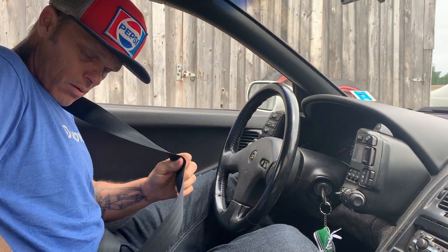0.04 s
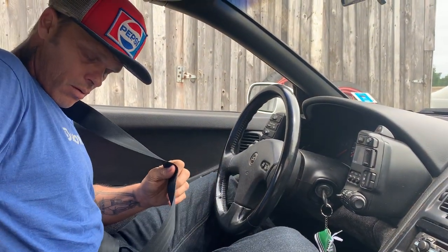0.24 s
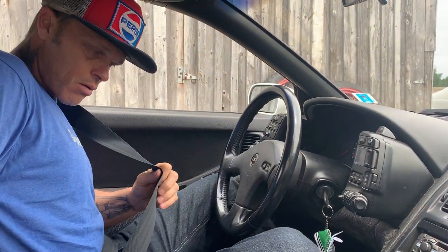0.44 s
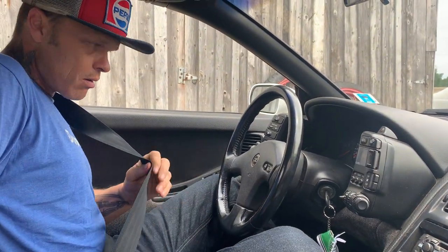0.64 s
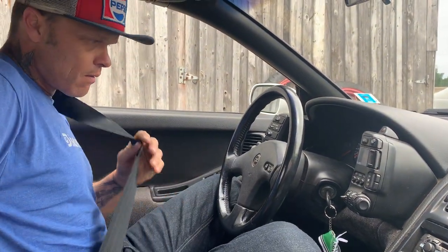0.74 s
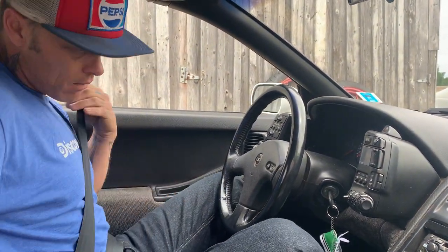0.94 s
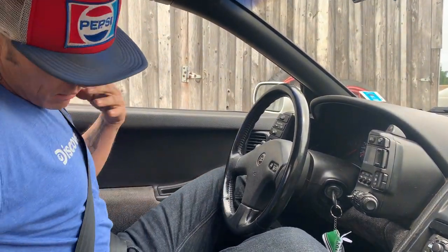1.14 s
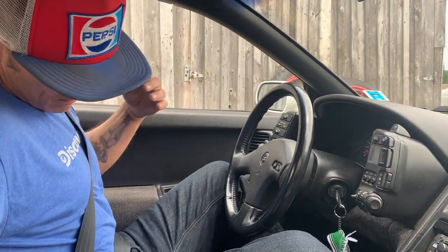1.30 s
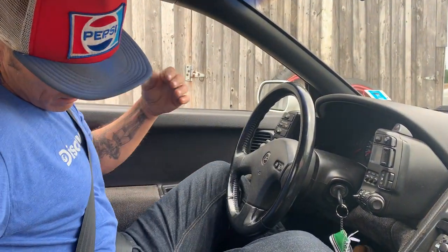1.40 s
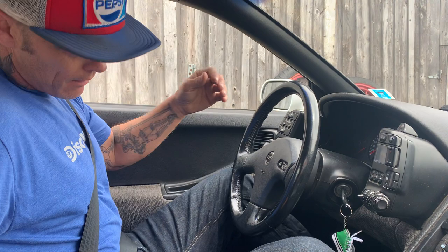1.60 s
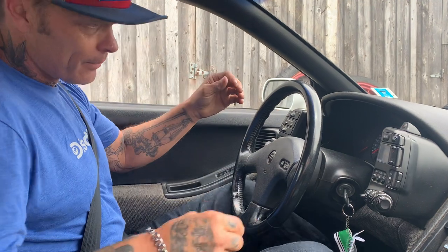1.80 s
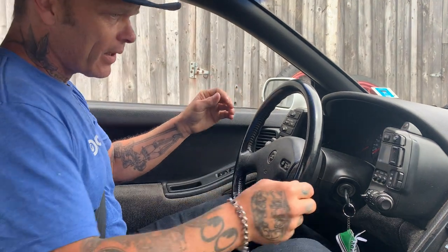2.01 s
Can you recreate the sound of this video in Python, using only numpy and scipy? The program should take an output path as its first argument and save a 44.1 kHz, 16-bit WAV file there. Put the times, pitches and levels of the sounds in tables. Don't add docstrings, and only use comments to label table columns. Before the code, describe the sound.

Seatbelt fastening heard close up in a quiet, dry car interior: the tongue fumbles and taps, latches with a loud ringing snap, then the belt hisses against clothing, the seat creaks briefly, and movement fades to near silence.

```python
import sys
import numpy as np
from scipy import signal
from scipy.fft import rfft, irfft
from scipy.io import wavfile
from scipy.ndimage import uniform_filter1d

SR = 44100
rng = np.random.default_rng(int(sys.argv[2]) if len(sys.argv) > 2 else 0)


def undo_db(level):
    steps = np.asarray(level, float) / 20
    return 10 ** steps


def persist_wave(psi):
    counts = np.round(np.clip(psi, -1, 1) * 32767).astype(np.int16)
    wavfile.write(sys.argv[1], SR, np.atleast_2d(counts).T)


N = 90493
T = np.arange(N) / SR
F = np.arange(N // 2 + 1) * SR / N
TAP = 1. * (T[:SR // 5] == 0)

# hz, density_db
QUIET_SPECTRUM = [(200, -10.5), (700, -10.5), (1600, -5), (2200, -31), (6000, -31), (16000, -15)]
QUIET_DB = -71.5

# time_s, rustle_db, dullness_db, seat_rumble_db
MOTION = [(0, -63.5, 4, -47.5), (.13, -57, -1, -59.5), (0.261, -66.5, 6.5, -51.5), (.38, -68, 9.5, -51),
          (0.549, -59.5, 1, -49), (0.643, -71, -3, -58.5), (.69, -56.5, -9, -52), (0.811, -57.5, 0, -52),
          (0.918, -52, -4, -49.5), (1.1, -53, -7, -47), (1.169, -62.5, 9.5, -48),
          (1.301, -56.5, -4.5, -59.5), (1.402, -63, 7, -56), (1.501, -79.5, 3, -55.5), (1.64, -75, 10, -67),
          (1.78, -70, -4, -55), (1.92, -70, 8.5, -57.5), (2.05, -69, 14.5, -50)]
# hz, density_db
WEBBING_SPECTRUM = [(300, -20), (700, -10), (1500, -3.5), (3500, -3), (6000, -7.5), (8500, -3), (11000, -5),
                    (16000, -5.5)]
# hz, density_db
SHIRT_SPECTRUM = [(300, -8), (800, -2), (2500, -3), (5000, -9), (9000, -33)]
# hz, density_db
RUMBLE_SPECTRUM = [(20, -21.5), (40, 3.5), (70, 5), (190, -3), (300, -12), (600, -25.5), (1200, -37.5),
                   (3000, -73.5)]
RUMBLE_FLICKER_DB, RUMBLE_FLICKER_HZ = 1.5, 21.9
GRAINS_PER_S, GRAIN_DB, GRAIN_SPREAD_DB = 900, -7.5, 1.8
FIBRE_FLICKER_DB, FIBRE_FLICKER_HZ = 4.08, 25.38

# start_s, level_db, pitch_hz, t60_s, settled_pitch_share
THUDS = [(0.015, -33, 182, 0.081, 0.3), (.182, -36, 230, 0.077, 0.55), (.203, -38.5, 112, 0.13, 0.59),
         (.296, -45, 200, 0.067, 0.69), (.341, -35.5, 240, 0.088, 0.76), (.372, -36.5, 195, 0.11, .7),
         (0.395, -41, 147, 0.069, 1), (.407, -37.5, 190, .1, 0.71), (0.476, -36.5, 200.4, .1, 0.36),
         (0.514, -31.5, 202.5, 0.084, 0.82), (.53, -38, 68.3, 0.24, 0.68), (0.561, -34.5, 88.6, .22, 0.58),
         (.786, -30.5, 199, 0.26, 0.31), (.665, -46, 172, 0.23, 0.28), (0.879, -41, 138, 0.26, 0.56),
         (1.22, -39.5, 128.5, 0.2, .3), (1.456, -44.5, 200, .08, 0.33), (1.468, -42, 139.3, 0.14, 0.5),
         (1.706, -49, 260, 0.097, 0.43), (1.937, -41.5, 159, 0.073, 0.68)]
THUD_GLIDE_S, THUD_RISE_S = .012, 0.0014

# start_s, level_db, stiffness_pitch_factor, upper_modes_db
CREAKS = [(.912, -22.5, 0.97, -1.5), (0.942, -28.5, 0.99, 11), (.947, -25, 0.96, 1), (.977, -24, 0.9, -8),
          (1.018, -30, 1.2, -2), (1.022, -22.5, 1.2, -10), (1.054, -26, 0.98, 5), (1.057, -24, 0.99, -6),
          (1.08, -29, 0.99, 3), (1.118, -33, 1.4, 0), (1.125, -19.5, 0.89, -4), (1.141, -29.5, 1.05, 4)]
# pitch_hz, level_db, t60_s
SEAT_MODES = [(240, 6, 0.035), (320, 0, 0.017), (408, -1.5, 0.022), (707, -1.5, 0.033), (982, -2, 0.018),
              (1374, -1.5, .025), (1550, -8, .02)]
SEAT_UPPER_HZ = 850

# start_s, level_db, length_s, centre_hz
RATTLES = [
    (0.29, -55.5, 0.011, 1230),
    (0.331, -54, 0.087, 921),
    (0.451, -56.5, 0.06, 2040),
    (0.696, -46.5, 0.039, 14600),
    (0.88, -56.5, 0.13, 303),
    (1.029, -57, 0.1, 320),
    (1.109, -53.5, 0.049, 264),
    (1.542, -83, 0.23, 1600),
    (1.696, -67.5, 0.043, 380),
    (1.948, -61, 0.1, 500),
]
RATTLE_PER_S, RATTLE_SKIRT_DB = 700, -15.5
# start_s, level_db, ring_hz, ring_db, brightness_db
KNOCKS = [(0.1627, -36, 3350, -11.5, 2.5), (.165, -54, 4300, 6.5, -7), (.1655, -59, 3720, 2.5, -9),
          (0.174, -49, 5860, 0.5, -14), (.212, -52.5, 1456, 4, -8), (.265, -68, 1550, 7, -29),
          (0.2878, -46.5, 1550, -2, -3), (.289, -55, 3000, 3.5, -6), (0.2901, -60, 1050, 6, -14),
          (.297, -57.5, 505, 10, -16), (.329, -54.5, 910, -6, -15), (.338, -53, 2080, 0.5, -13),
          (0.353, -47.5, 4320, -8, -2), (0.356, -53.5, 1045, 3, -20), (0.367, -57.5, 3540, -0.5, 6),
          (0.3862, -50.5, 1034, 5.5, -18.5), (.387, -50.5, 1950, -0.5, -19.5), (.396, -52.5, 1900, -2, -28),
          (0.444, -61.5, 3930, 2, -24), (.4565, -48.5, 950, -1.5, -24.5), (0.458, -64, 2900, 3, -18),
          (0.4659, -47.5, 964, -1, 20.5), (.469, -62, 4000, 5, -21.5), (.669, -56, 1900, -4.5, -9.5),
          (.737, -41, 1088, -6.5, 6), (.748, -50.5, 1480, -4, -18), (0.7666, -44.5, 4480, -6.5, -4.5),
          (.769, -49.5, 6450, 2, -13), (1.098, -62.5, 1810, 4.5, -18), (1.273, -63, 970, 4, -24)]
KNOCK_S, KNOCK_T60_S = 0.0044, .028

# start_s, level_db, length_s
LATCH_CONTACTS = [(0.4877, -31.5, 0.0049), (0.4932, -37, 0.0039), (0.4978, -11.5, .0016),
                  (0.4997, -12.5, 0.0023), (0.501, -13.5, .001), (0.5033, -23, 0.0024), (.5062, -24, 0.001),
                  (.509, -29.5, 0.0027), (.5125, -29, 0.0018), (.516, -32.5, 0.003), (0.519, -39.5, .0096)]
# hz, density_db
CRACK_SPECTRUM = [(300, -33), (1100, -17.5), (1900, 1), (3500, -12), (5200, -13.5), (6800, -8), (9300, -12),
                  (15500, -3.5)]
# pitch_hz, level_db, t60_s
BUCKLE_MODES = [(1431, 0.5, 0.055), (1548, 1, .05), (1602, -6.5, 0.086), (1900, 0.5, 0.034),
                (2014, 4, 0.066), (2070, 2, .05), (2453, -6, .04), (3377, -14.5, 0.061), (3705, -11, .07),
                (4070, -12.5, .08), (5294, -18.5, .07), (6330, -3.5, 0.055), (6560, -2.5, .05),
                (7060, -15.5, 0.033)]
BUCKLE_DB, BUCKLE_T60_TOP_S = 8.5, .075
# pitch_hz, level_db, t60_s
PAWL_MODES = [(11060, -10.5, .02), (11300, -6.5, 0.047), (14720, -2.5, .025), (15100, 1, .025),
              (15420, 2, .022)]
PAWL_DB = -12.5
# hz, gain_db
METAL_TONE = [(200, -22.5), (600, -12.5), (1200, -4), (16000, 1.5)]
# pitch_hz, level_db, t60_s
HOUSING_MODES = [(428, -2.5, 0.058), (540, -1, 0.068), (727, -6, 0.03), (1060, -8.5, 0.06)]
REBOUND_S, REBOUND_DB = .508, -12.5

# hz, gain_db
CABIN_TRIM = [(300, 4), (3000, 3), (7000, 1), (16000, -7)]
CABIN_T60_S, CABIN_DB = 0.038, -3.5

# hz, difference_db
PORT_DIFFERENCE = [(30, -23), (70, -19), (150, -14), (300, -6), (600, -3), (5500, -2), (7200, -5),
                   (8200, -22), (16000, -24)]
# hz, lead_rad
PORT_LEAD = [(0, 0), (500, .3), (1200, 2.3), (3400, 2.6), (6100, .1), (8400, -3.14), (11100, -6.28),
             (13450, -9.42), (15600, -12.5), (17000, -14)]
TOP_HZ, TOP_SLOPE_HZ = 15820, 123


def curve(table, hz):
    tab = np.array(table, float)
    return np.interp(np.log(hz + 1), np.log(tab[:, 0] + 1), tab[:, 1], left=tab[0, 1] - 12)


def unit_power(x, response):
    return signal.fftconvolve(x, response / np.sqrt(np.sum(response ** 2)))[:len(x)]


def colour(x, table):
    cepstrum = irfft(curve(table, np.arange(2049) * SR / 4096) * np.log(10) / 20)
    cepstrum[1:2048] *= 2
    cepstrum[2049:] = 0
    return unit_power(x, irfft(np.exp(rfft(cepstrum))))


def ring(x, modes):
    t = T[:SR // 5]
    body = 0
    for hz, db, t60 in modes:
        body = body + undo_db(db) * np.sin(2 * np.pi * hz * t) * undo_db(-60 * t / max(t60, .003))
    return unit_power(x, body)


def place(sounds, rows):
    out = np.zeros(N)
    for x, row in zip(sounds, rows):
        part = out[int(row[0] * SR):][:len(x)]
        part += undo_db(row[1]) * x[:len(part)]
    return out


def walk(rate):
    hold = int(SR / rate)
    steps = np.repeat(rng.standard_normal(N // hold + 1), hold)
    return 0.79 * uniform_filter1d(uniform_filter1d(steps, hold), hold)[:N]


def chatter(length, spread_db=4.0):
    t = T[:SR // 10]
    rise = np.clip(t / 0.00056, 0, 1)
    fall = np.exp(-np.clip(t - length, 0, 1) / (0.47 * length))
    uneven = undo_db(spread_db * rng.standard_normal(len(t)) - 4.0)
    return rise * fall * rng.standard_normal(len(t)) * uneven


def quiet():
    return undo_db(QUIET_DB) * colour(rng.standard_normal(N), QUIET_SPECTRUM)


def fibres(db, table):
    catches = rng.random(N) < GRAINS_PER_S / SR
    grains = catches * rng.standard_normal(N) * undo_db(GRAIN_SPREAD_DB * rng.exponential(size=N))
    rub = rng.standard_normal(N) + undo_db(GRAIN_DB) * grains / grains.std()
    return colour(rub * undo_db(db + FIBRE_FLICKER_DB * walk(FIBRE_FLICKER_HZ)), table)


def cloth():
    move = np.array(MOTION, float)
    rustle_db, dull_db, rumble_db = (np.interp(T, move[:, 0], move[:, k]) for k in (1, 2, 3))
    rumble_level = undo_db(rumble_db + RUMBLE_FLICKER_DB * walk(RUMBLE_FLICKER_HZ))
    rumble = colour(rng.standard_normal(N) * rumble_level, RUMBLE_SPECTRUM)
    webbing = fibres(rustle_db, WEBBING_SPECTRUM)
    shirt = fibres(rustle_db + dull_db - 6, SHIRT_SPECTRUM)
    return webbing + shirt + rumble


def thuds():
    out = np.zeros(N)
    for start, db, hz, t60, share in THUDS:
        t = np.clip(T - start, 0, None)
        glide = THUD_GLIDE_S * (1 - np.exp(-t / THUD_GLIDE_S))
        turns = hz * (share * t + (1 - share) * glide)
        rise = 1 - np.exp(-t / THUD_RISE_S)
        out -= undo_db(db - 60 * t / t60) * np.sin(2 * np.pi * turns) * rise
    return out


def creak(stiffness, upper_db):
    frame = [(stiffness * hz, db + upper_db * (hz > SEAT_UPPER_HZ), t60) for hz, db, t60 in SEAT_MODES]
    return ring(TAP, frame)


def creaks():
    return place([creak(*row[2:]) for row in CREAKS], CREAKS)


def rattle(length, hz):
    t = T[:SR // 4]
    contacts = rng.random(len(t)) < RATTLE_PER_S / SR
    hits = contacts * rng.standard_normal(len(t)) * np.sqrt(SR / RATTLE_PER_S)
    swell = np.sin(np.pi * np.clip(t / length, 0, 1)) ** .5
    skirt = RATTLE_SKIRT_DB
    spectrum = [(hz / 4, skirt), (hz, 0), (4 * hz, skirt), (16 * hz, 3 * skirt)]
    return colour(uniform_filter1d(hits, size=3) * swell, spectrum)


def knock(hz, ring_db, bright_db):
    hit = chatter(KNOCK_S)
    tick = colour(hit, [(300, 2.0), (1500, 1.5), (3000, 0.13 * bright_db), (7000, min(bright_db, 0) - 0.5),
                        (9500, bright_db), (16000, bright_db)])
    tone = ring(TAP, [(hz, 0, KNOCK_T60_S)])[:len(hit)]
    return tick + undo_db(ring_db) * np.sqrt(np.sum(hit ** 2)) * tone


def knocks():
    ticks = place([knock(*row[2:]) for row in KNOCKS], KNOCKS)
    return ticks + place([rattle(*row[2:]) for row in RATTLES], RATTLES)


def latch():
    hits = place([chatter(row[2]) for row in LATCH_CONTACTS], LATCH_CONTACTS)
    taps = place([TAP] * len(LATCH_CONTACTS), LATCH_CONTACTS)
    buckle = ring(taps, [(hz, db, min(t60, BUCKLE_T60_TOP_S)) for hz, db, t60 in BUCKLE_MODES])
    pawl = ring(hits, PAWL_MODES)
    metal = colour(hits, CRACK_SPECTRUM) + undo_db(BUCKLE_DB) * buckle + undo_db(PAWL_DB) * pawl
    housing = place([ring(TAP, HOUSING_MODES)], [(REBOUND_S, REBOUND_DB)])
    return colour(metal, METAL_TONE) + housing


def cabin(x):
    t = T[:SR // 6]
    decay = undo_db(-60 * t / CABIN_T60_S) * (t > .001)
    tail = rng.standard_normal(len(t)) * decay / np.sqrt(CABIN_T60_S * SR / 14)
    return x + undo_db(CABIN_DB) * signal.fftconvolve(x, colour(tail, CABIN_TRIM))[:N]


def path():
    hard_sounds = cabin(latch() + knocks() + creaks())
    return rfft(quiet() + cloth() + thuds() + hard_sounds)


def scene():
    side = np.array([[1], [-1]])
    ratio = undo_db(curve(PORT_DIFFERENCE, F))
    shared, differing = path(), path()
    ports = (shared - 1j * side * ratio * differing) / np.sqrt(1 + ratio ** 2)
    half_lead = np.interp(F, *np.array(PORT_LEAD, float).T) / 2
    return irfft(ports * np.exp(1j * half_lead * side), N)


def band_limit(x):
    return signal.sosfilt(signal.butter(12, 16990, fs=SR, output="sos"), x)


def record(dry):
    top_cut = 1 / (1 + np.exp((F - TOP_HZ) / TOP_SLOPE_HZ))
    mix = irfft(rfft(dry) * top_cut, N)
    return band_limit(mix)


dry = scene()
out = record(dry)
persist_wave(out)
```